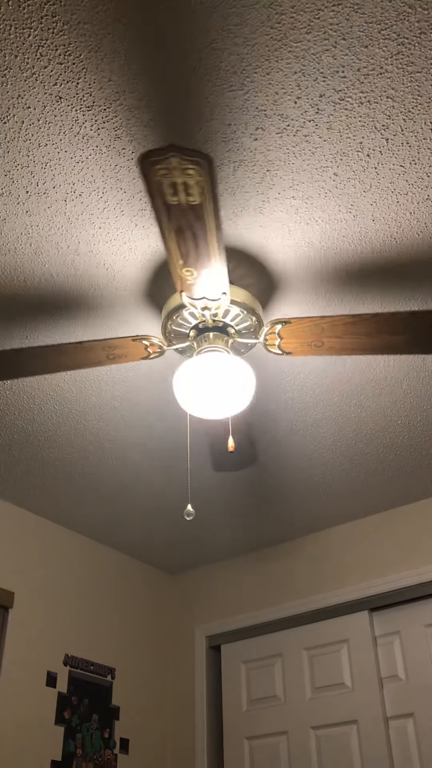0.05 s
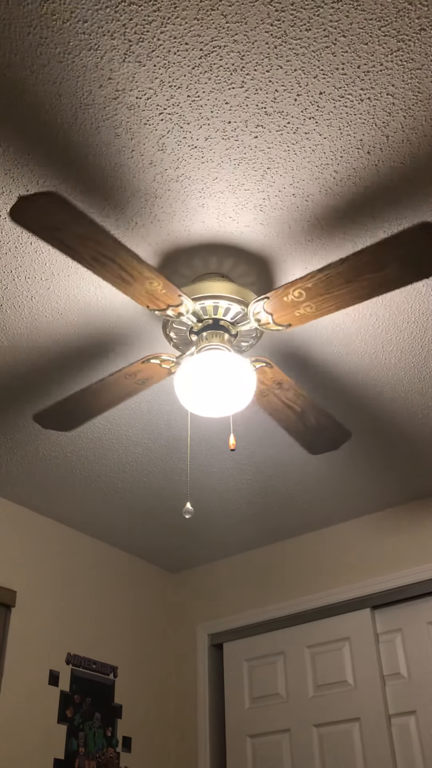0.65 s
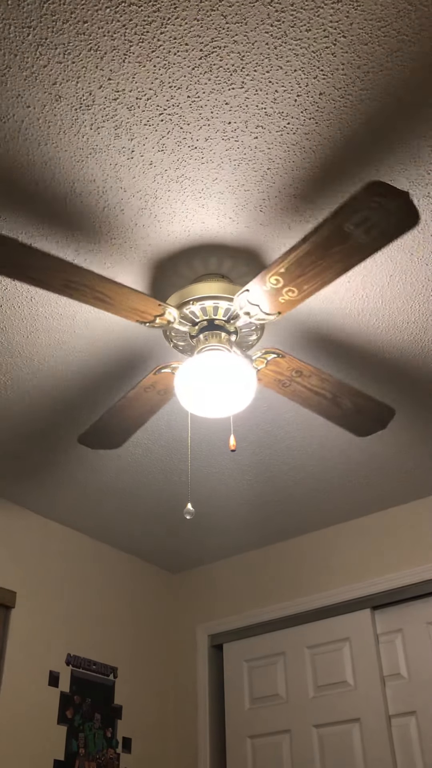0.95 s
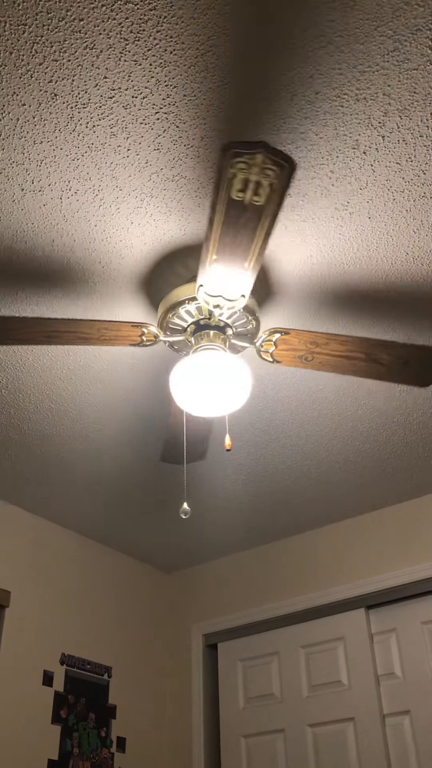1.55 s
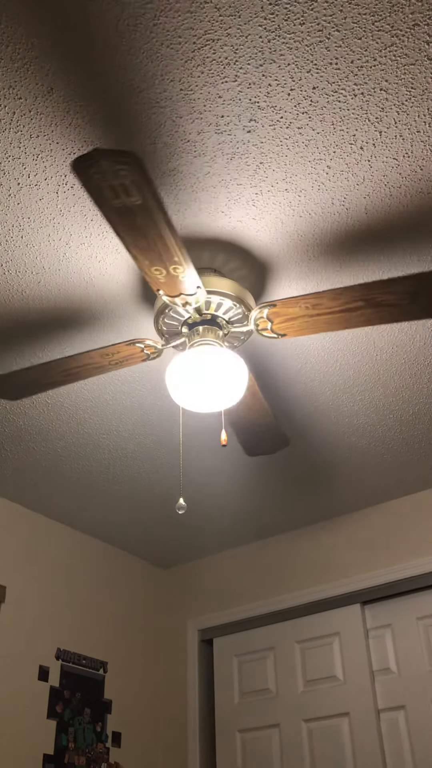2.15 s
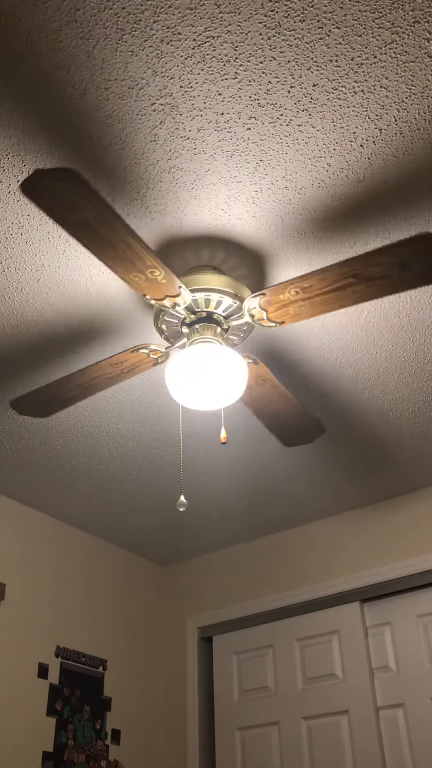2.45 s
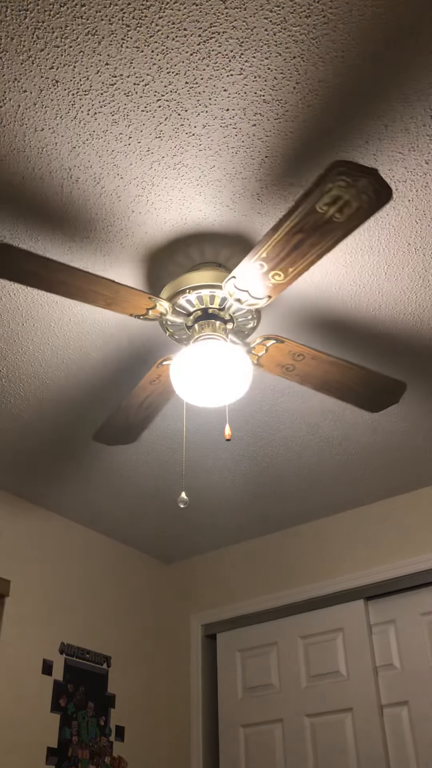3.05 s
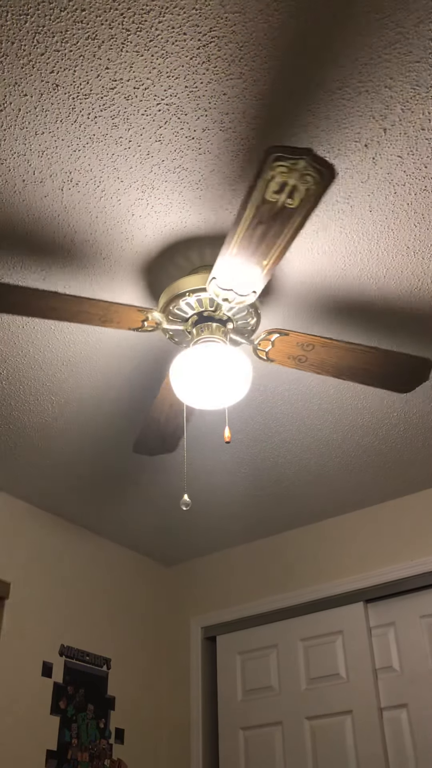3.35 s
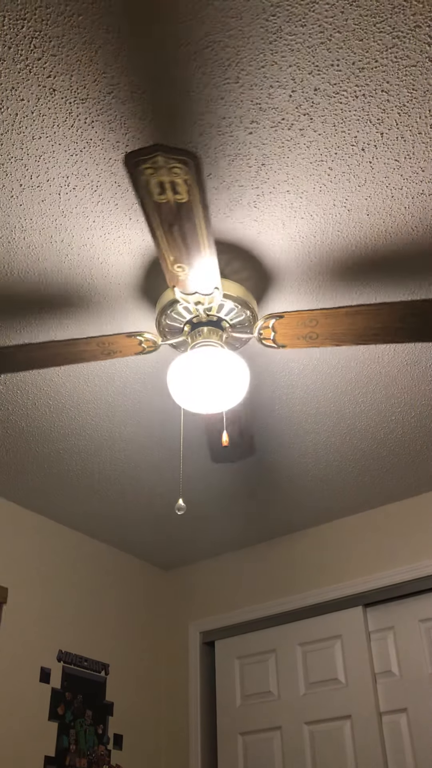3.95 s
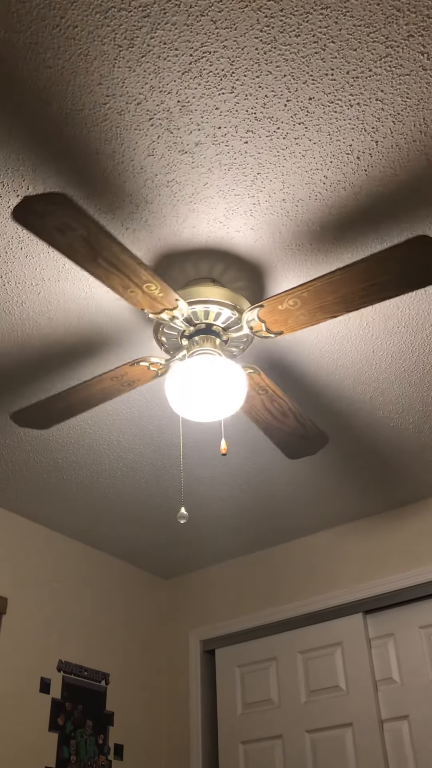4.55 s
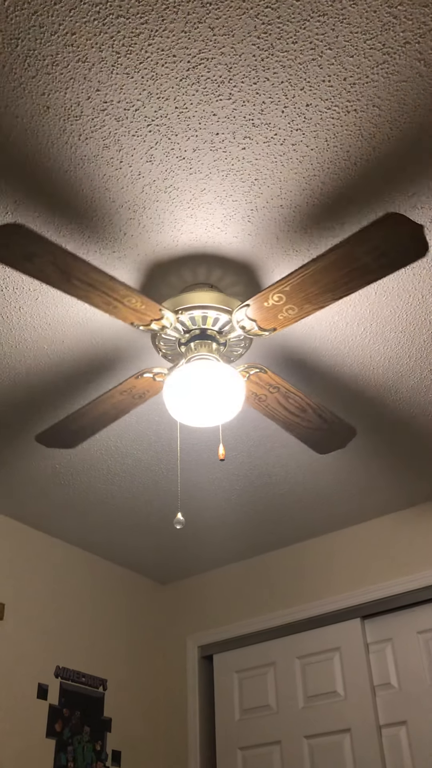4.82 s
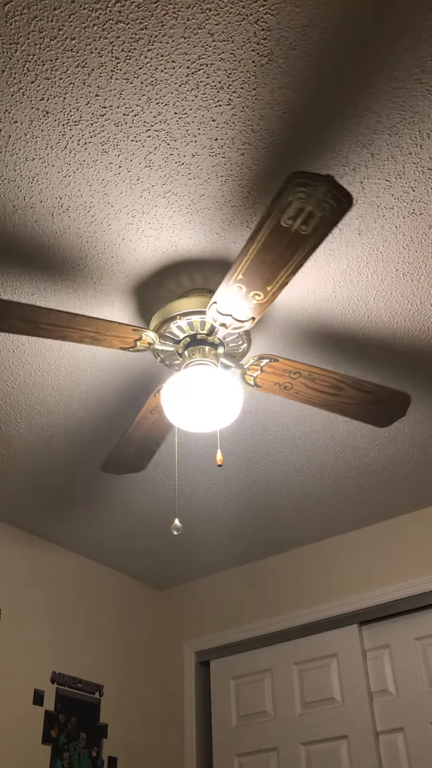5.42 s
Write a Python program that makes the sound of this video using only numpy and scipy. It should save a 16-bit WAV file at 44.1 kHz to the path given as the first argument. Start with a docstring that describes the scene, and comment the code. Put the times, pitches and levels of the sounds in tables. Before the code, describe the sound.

A ceiling fan runs steadily in a quiet bedroom, heard from below for about five and a half seconds. The main sound is a deep, smooth motor drone, joined by a low electrical hum that throbs gently and unevenly, and weaker steady tones from the vibrating housing. Stirred air adds a low rumble and a soft, slightly swelling rush. Far beneath are microphone hiss, tiny regular electrical ticks at about ten a second, and a faint, very high electronic whine. The whine drops out briefly at about 1, 2.3, 3.5, 4.8 and 5 seconds. The drone eases off a little over the first four seconds, then holds. At about 5 seconds two thin, faint, very high whistles sound together, one a mere blip, the other softer and lasting to the end, while the fan keeps running.

```python
"""A ceiling fan runs steadily in a quiet bedroom, heard from below.
From the start the motor drones just under mains frequency, its iron hums and throbs at twice the mains,
the housing adds low tones and stirred air rumbles and rushes, over microphone hiss and electrical ticks.
From about 1 s a faint electronic whine cuts out now and then, while the drone slowly eases off.
Near 5 s two thin, brief whistles sound."""
import sys
import numpy as np
from scipy import signal
from scipy.fft import rfft, irfft
from scipy.io import wavfile

SR = 44100
rng = np.random.default_rng(int(sys.argv[2]) if len(sys.argv) > 2 else 0)


def wrap_up_sound(samples):
    """Save the sound to the file named by the first command line argument, as 16-bit audio."""
    columns = np.atleast_2d(samples).T
    # keep every value between -1 and 1, then stretch to whole-number steps
    tamed = np.clip(columns, -1, 1)
    steps = np.round(tamed * 32767).astype(np.int16)
    wavfile.write(sys.argv[1], SR, steps)


N = 246078
TIME = np.arange(N) / SR
BINS = np.fft.rfftfreq(N, 1 / SR)


def motor(motor_hz=58.96, slip_hz=.015, flutter_db=2.5):
    """Smooth fundamental and faint harmonic buzz, locked to one slightly uneven speed."""
    # motor partials: harmonic, level_db
    harmonics = [(1, -37.5), (3, -74), (4, -93.5), (5, -80), (6, -82), (7, -87), (8, -91), (9, -80),
                 (10, -82.5), (11, -90.5), (14, -96), (15, -89.5), (16, -92), (18, -95), (19, -95.5),
                 (20, -92.5), (21, -89), (23, -92), (24, -98.5), (25, -93), (26, -94.5)]
    # drone contour, applied about its mean: time_s, level_db
    contour = [(0.0, -36.5), (2.13, -37.5), (4.09, -39), (5.58, -39)]
    turns = np.cumsum(motor_hz + slip_hz * wander(2)) / SR
    contour_db = np.interp(TIME, *np.transpose(contour))
    drone = amp(harmonics[0][1] + contour_db - contour_db.mean()) * sine(turns)
    # moving blades vary the path to the ear: each harmonic flutters on its own
    buzz = sum(amp(db + flutter_db * wander(3)) * sine(k * turns) for k, db in harmonics[1:])
    return drone + buzz


def iron_hum(hum_hz=120, hum_db=-51.5, waver_db=.8, sway_turns=.02):
    """Iron pulled twice per mains cycle; two close, weaker tones beat with it in an uneven throb."""
    # side tones: offset_hz, level_db, crest_s
    beats = [(1.23, -59, .706), (-2.32, -62, 0.37)]
    turns = hum_hz * TIME + sway_turns * wander(3.5) + rng.random()
    tones = amp(hum_db) * np.sin(2 * np.pi * turns)
    for offset_hz, db, crest_s in beats:
        tones += amp(db) * np.sin(2 * np.pi * (turns + offset_hz * (TIME - crest_s)))
    return np.sqrt(2) * tones * amp(waver_db * wander(4))


def housing(flutter_db=.76):
    """Vibrating housing: low tones of steady pitch."""
    # housing tones: pitch_hz, level_db
    tones = [(40.42, -57.5), (80.85, -63.5), (83.65, -59), (100.56, -57), (125.45, -64.5), (161.67, -57.5),
             (240, -77.5), (242.5, -78), (283, -84.5), (334, -84), (565.5, -85), (1027.5, -91)]
    return sum(amp(db + flutter_db * wander(2.3)) * sine(hz * TIME) for hz, db in tones)


def air(swell_hz=.7, crest_s=.84, swell_db=.8, split_hz=800, eddy_db=.4, throb_hz=11.1, throb_db=.35):
    """Stirred air rumbles; the blade rush rings room and housing, swells in its lows and throbs."""
    # room air spectrum: freq_hz, density_db
    rumble_spectrum = [(24, -92), (32, -91), (38, -76.5), (52, -80.5), (64, -67), (78, -74), (92, -63),
                       (108, -70), (118, -67.5), (132, -81), (143, -77), (165, -81), (188, -98)]
    # spectrum of air over the blades: freq_hz, density_db
    rush_spectrum = [(192, -91.5), (268, -94.5), (440, -96.5), (560, -93.5), (610, -95.5), (770, -101.3),
                     (860, -99), (910, -101.9), (1020, -100.0), (1200, -105.9), (1500, -107.2),
                     (1800, -112)]
    # room and housing resonances: centre_hz, width_hz, density_db
    resonances = [(206.6, 12, -87), (249, 18, -88.5), (291, 22, -90), (341.7, 30, -90.5), (478, 18, -95.5)]
    rumble = noise(band(rumble_spectrum), gain_db=.3)
    ring = sum(noise(db + peak(hz, width_hz), gain_db=-1.2) for hz, width_hz, db in resonances)
    rush = noise(band(rush_spectrum, skirt_db_per_oct=410)) + ring
    low = irfft(rfft(rush) / (1 + (BINS / split_hz) ** 4), N)
    high = rush - low
    swell = amp(swell_db * np.cos(2 * np.pi * swell_hz * (TIME - crest_s)))
    flutter = amp(eddy_db * wander(14) + throb_db * sine(throb_hz * TIME))
    return rumble + (low * swell + high) * flutter


def hiss(flicker_db=.5):
    """Microphone hiss with a slight flicker."""
    # noise floor: freq_hz, density_db
    spectrum = [(1815, -111), (2400, -111.8), (4550, -114), (4900, -117.3), (5300, -114.4), (6200, -113),
                (7200, -115.8), (7750, -119.7), (8300, -117.4), (9600, -117.7), (10450, -122.8),
                (11200, -117.4), (12100, -116.5), (15650, -118.8)]
    return noise(band(spectrum, skirt_db_per_oct=399)) * amp(flicker_db * wander(33))


def whistles():
    """Two thin, brief electronic tones."""
    # whistles: start_s, end_s, pitch_hz, wander_hz, level_db
    tones = [(5.025, 5.085, 15060, 90, -81), (5.03, 5.7, 10180, 2, -93.5)]
    return sum(amp(db) * gate(start_s, end_s) * sine(np.cumsum(hz + wander_hz * wander(150)) / SR)
               for start_s, end_s, hz, wander_hz, db in tones)


def whine(whine_hz=12945, core_db=-84, drift_hz=45, jitter_hz=55, fizz_density_db=-111.5):
    """High, unsteady electronic tone in a band of fizz; both drop out together."""
    # dropouts: start_s, end_s
    gaps = [(.98, 1.18), (2.26, 2.40), (3.53, 3.61), (4.81, 4.87), (5.02, 5.10)]
    fizz = noise(fizz_density_db + peak(whine_hz - 100, width_hz=700))
    pitch_hz = whine_hz + drift_hz * wander(10) + jitter_hz * wander(300)
    core = amp(core_db) * sine(np.cumsum(pitch_hz) / SR)
    muted = sum(gate(start_s, end_s, edge_s=.023) for start_s, end_s in gaps)
    return (fizz + core) * (1 - muted)


def ticks(first_s=.0965, period_s=.1024, half_width_s=.0009, spread_db=2):
    """Electrical ticks: tiny treble bursts, strict in pace, uneven in level."""
    # tick spectrum: freq_hz, density_db
    spectrum = [(4000, -116), (10400, -118), (12500, -107), (15600, -111)]
    from_tick_s = (TIME - first_s + period_s / 2) % period_s - period_s / 2
    bursts = np.exp(-(from_tick_s / half_width_s) ** 2)
    return noise(band(spectrum), gain_db=.5) * bursts * amp(spread_db * wander(10))


def amp(db):
    """Decibels to gain."""
    return 10 ** (np.asarray(db) / 20)


def wander(hz):
    """Random drift, rms 1, band-limited to about hz."""
    drift = irfft(rfft(rng.standard_normal(N)) * np.exp(-(BINS / hz) ** 2) * (BINS > 0), N)
    return drift / drift.std()


def noise(density_db, gain_db=0):
    """Noise of the given power density (dB in 1 Hz), times a gain."""
    return irfft(rfft(rng.standard_normal(N)) * amp(density_db + gain_db), N) * np.sqrt(SR / 2)


def band(points, skirt_db_per_oct=150):
    """Spectrum in dB through the points, falling off beyond its ends."""
    hz, db = np.transpose(points)
    octave, knots = np.log2(BINS + 1), np.log2(hz + 1)
    outside_oct = abs(octave - np.clip(octave, knots[0], knots[-1]))
    return np.interp(octave, knots, db) - skirt_db_per_oct * outside_oct


def peak(hz, width_hz):
    """Resonance shape in dB; full width taken 6 dB below the top."""
    return -20 * np.log10(1 + (2 * (BINS - hz) / width_hz) ** 2)


def sine(turns):
    """Tone of rms 1, random start phase."""
    return np.sqrt(2) * np.sin(2 * np.pi * (turns + rng.random()))


def gate(start_s, end_s, edge_s=.012):
    """Unit gate with linear edges."""
    return np.clip(np.minimum(TIME - start_s, end_s - TIME) / edge_s + .5, 0, 1)


def scene():
    """Fan and background at one microphone."""
    return (motor() + iron_hum() + housing() + air() + hiss() + whistles() + whine() + ticks())[None]


def record(dry, cutoff_hz=15760):
    """Short end fades, then a steep low-pass."""
    fades = signal.windows.tukey(N, .003)
    taps = signal.firwin(2047, cutoff_hz, window=("kaiser", 9), fs=SR)
    return signal.oaconvolve(dry * fades, taps[None], "same")


dry = scene()
out = record(dry)
wrap_up_sound(out)
```